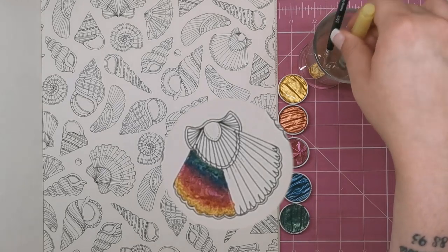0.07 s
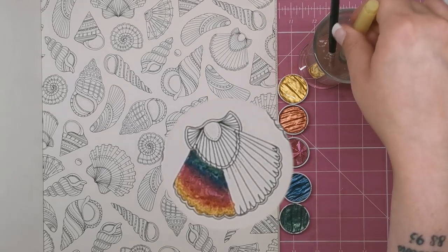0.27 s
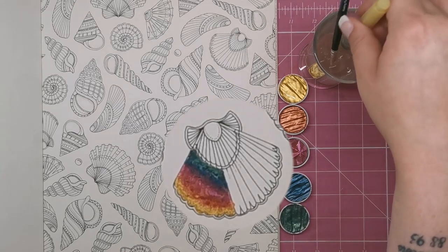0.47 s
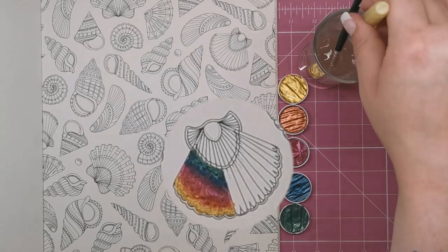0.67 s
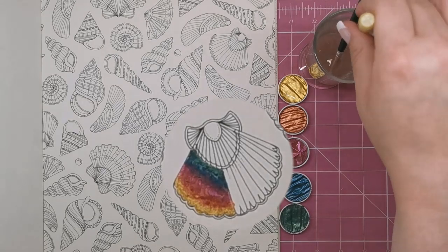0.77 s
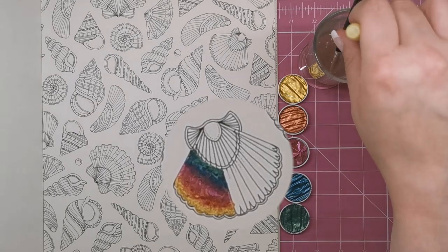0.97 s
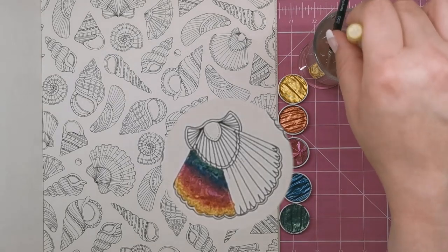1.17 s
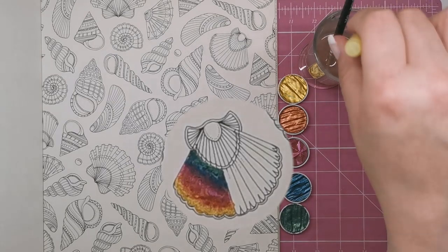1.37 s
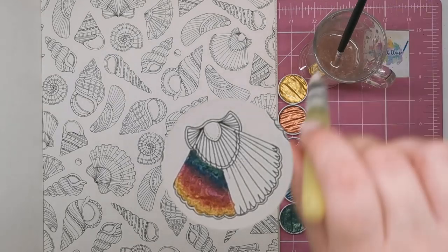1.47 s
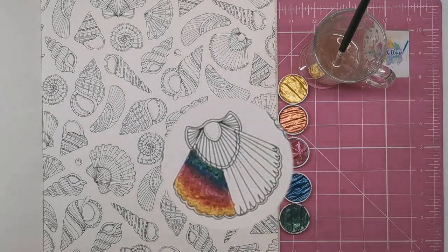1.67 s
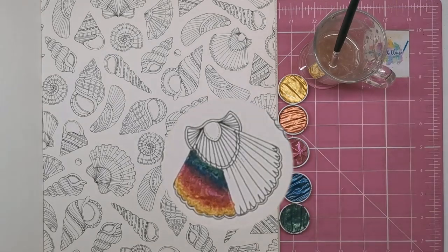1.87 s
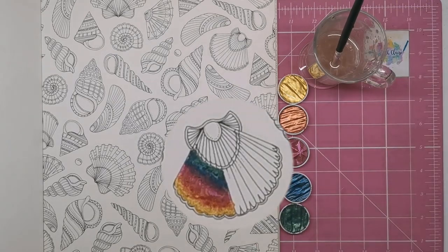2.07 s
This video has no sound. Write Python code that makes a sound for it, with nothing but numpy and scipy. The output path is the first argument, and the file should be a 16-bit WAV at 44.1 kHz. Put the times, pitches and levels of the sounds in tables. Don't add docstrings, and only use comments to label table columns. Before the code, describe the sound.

Irregular bright knocks of a brush on a hand-held water glass, the glass rocking dully on the table, a pause, then a final run of clinks with light scraping; close stereo pickup, small humming room.

```python
import sys
import numpy as np
from scipy import signal
from scipy.fft import rfft, irfft, next_fast_len
from scipy.io import wavfile

SR = 44100
rng = np.random.default_rng(int(sys.argv[2]) if len(sys.argv) > 2 else 0)


def gain_from_decibels(decibels):
    exponent = np.asarray(decibels, float) / 20
    return 10 ** exponent


def store_pcm(level_fs):
    pcm = np.round(np.clip(level_fs, -1, 1) * 32767).astype(np.int16)
    wavfile.write(sys.argv[1], SR, np.atleast_2d(pcm).T)


N = 93403
LEAD, LONG = SR // 10, SR // 2

# frequency in Hz, level in dB per Hz.
AIR_SPECTRUM = [(12, -45), (20, 1), (65, -8.5), (134, -4), (301, -18.5), (589, -13.5), (1570, -25),
                (2260, -21.5), (16000, -38)]
# frequency in Hz, left-right correlation.
PORT_LIKENESS = [(60, 1), (240, 0.72), (950, -0.05), (3770, -0.21), (15000, 0.17)]
# frequency in Hz, T60 in seconds.
WALL_T60 = [(100, 0.31), (1000, 0.25), (3000, .42), (9000, 0.34), (15000, 0.33)]

# start in seconds, lower ring in dB, upper ring in dB, ferrule clack in dB,
# time the ring stays free in seconds.
KNOCKS = [(-.006, -41, -39, -55, .025), (0.2376, -36.5, -35.5, -44, 0.039), (0.3062, -65, -60, -44, 0.038),
          (0.3783, -25, -35.5, -42.5, 0.025), (.6185, -64, -41.5, -67, 0.044),
          (0.6617, -26, -36, -47.5, 0.034), (1.03, -46.5, -40, -41.5, 0.049), (1.095, -62, -50, -56, .035),
          (1.151, -47.5, -37.5, -37, 0.042), (1.261, -57, -34.5, -37, 0.041),
          (1.367, -55.5, -34.5, -39.5, 0.046)]
# handle overtones in dB, belly in dB, rim in dB, crack in dB.
LANDINGS = [(-47, -64, -64, -38.5), (-60, -54.5, -52, -36.5), (-68, -63, -64, -46.5),
            (-43, -34.5, -36, -29), (-39, -60, -52, -40.5), (-51.5, -58, -47, -30.5), (-64, -66, -61, -40),
            (-68, -59, -55, -44.5), (-60, -54, -40, -34.5), (-61, -54.5, -39.5, -34.5),
            (-59, -59, -39, -35)]
# lower in Hz, upper in Hz.
RING_HZ = (3080, 3326)
# T60 in seconds, left over right in dB, left lead in radians.
RING_MODES = [
    (.5, -4.6, 2.06),
    (.36, 2.4, 1.86),
]
# family (0 handle, 1 belly, 2 rim), frequency in Hz.
OVERTONE_HZ = [(0, 3990), (1, 4345), (1, 4405), (1, 4462), (1, 4600), (2, 7315), (2, 7708), (2, 8895),
               (2, 8950), (2, 9200), (2, 9985)]
# level in dB, T60 in seconds, left over right in dB.
OVERTONE_MODES = [(-.5, .09, -3), (-7, 0.096, -1), (-1, 0.047, -1), (-3.5, 0.071, -4.5), (-2, 0.026, -3),
                  (-14, 0.071, 1.6), (-8, 0.062, -1), (-4, 0.062, -6.5), (-1, 0.095, -5.5),
                  (-4.5, 0.04, -6), (-15, 0.035, -5)]
# frequency in Hz, level in dB, T60 in seconds, left over right in dB.
FERRULE_MODES = [(948, -9, 0.031, -1.5), (1349, -6, 0.029, -17.5), (1411.4, 4.3, 0.029, -2.5),
                 (1563, -2.5, 0.024, -8.5), (2170, -7.5, 0.029, 1.5), (2415, -11, 0.03, 1)]
# frequency in Hz, level in dB.
CRACK_SPECTRUM = [(500, -18), (1500, -7), (3500, -2), (5000, -4.5), (7500, -2), (10000, -2), (13000, -12),
                  (16000, -22.5)]

# start in seconds, level in dB, extra level of upper modes in dB.
THUDS = [(0.03, -52, -4), (.088, -59, -2.5), (.156, -45, -4), (.24, -62, 7), (0.307, -46, -1.5),
         (0.457, -52, -2.5), (0.5746, -40, -2), (.64, -57.5, 3.5), (1.031, -54.5, 6), (1.097, -60, 7),
         (1.152, -49, 5), (1.262, -46, 3.5), (1.368, -46, 5.5)]
# frequency in Hz, level in dB, T60 in seconds, left over right in dB.
TABLE_MODES = [(86.8, -8, 0.31, -5.5), (124.5, 1.5, .17, -2.5), (188, -3.5, .15, 4.5),
               (237.8, -4, .15, 0.5), (279, -8, .13, 6.5)]

# start in seconds, rise in seconds, hold in seconds, fade T60 in seconds,
# level in dB.
TOUCH = (.9995, .002, 0.0334, 0.56, -56.5)
SCRAPE = (1.025, 0.01, 0.16, 1, -58)
WRIST = (1.385, .03, .16, .25, -64)
SLIDE = (1.44, .12, .145, .2, -66)
# frequency in Hz, width in Hz, level in dB.
RIM_EDGE = [(620, 130, -11), (2180, 170, 1), (2820, 250, -10)]
BRISTLES = [(610, 210, -8.5), (2170, 250, -0.5), (2800, 430, -4.5), (4530, 2000, -10), (7000, 2700, -12)]
TABLE_BOARD = [(150, 50, -3), (280, 70, -.4), (450, 120, -9)]
SLEEVE = [(129, 40, -2.5), (583, 70, -4.5), (702, 73, 0.1), (2200, 500, -11), (6800, 430, -22)]

RISE_S = 0.0016
WALL_DELAY_S = 0.006
ROOM_DB = -4


def unit(x):
    return x / np.sqrt(np.mean(x ** 2) + 1e-20)


def along(points, hz):
    f, v = np.transpose(points)
    return np.interp(np.log(hz + 1), np.log(f + 1), v)


def filtered(x, response):
    n = x.shape[-1]
    m = next_fast_len(n + 8192)
    spectrum = rfft(x, m) * response(np.fft.rfftfreq(m, 1 / SR))
    return irfft(spectrum, m)[..., :n]


def air():
    air_db, hum_db, hum_hz, hum_width_hz = -67, -80.5, 588.3, 8.3

    def spread(hz):
        angle = np.arccos(np.clip(along(PORT_LIKENESS, hz), -1, 1)) / 2
        return gain_from_decibels(along(AIR_SPECTRUM, hz)) * [np.cos(angle), np.sin(angle)]

    mid, side = filtered(rng.standard_normal((2, N)), spread)
    tone = np.array([mid + side, mid - side]) / np.std(mid)
    hum = filtered(rng.standard_normal(N), lambda hz: 1 / (1 + ((hz - hum_hz) / hum_width_hz) ** 2))
    return gain_from_decibels(air_db) * tone + gain_from_decibels(hum_db) * unit(hum)


def mode(hz, db, t60, pan_db, lead, rise=RISE_S):
    t = np.arange(LONG) / SR
    side = np.array([[0.5], [-0.5]])
    envelope = gain_from_decibels(db + side * pan_db - 60 * t / t60) * (1 - np.exp(-t / rise))
    return envelope * np.sin(2 * np.pi * hz * t + side * lead)


def add(out, s, sound, wet_db):
    hz, t, z = signal.stft(rng.standard_normal((2, LONG)), SR, nperseg=256)
    decay = gain_from_decibels(-60 * t / along(WALL_T60, hz)[:, None])
    tail = signal.istft(z * decay, SR, nperseg=256)[1]
    tail = np.pad(tail / np.linalg.norm(tail[0]), ((0, 0), (round(WALL_DELAY_S * SR), 0)))
    wet = signal.fftconvolve(sound, tail, axes=1)[:, :LONG]
    out[:, LEAD + round(s * SR):][:, :LONG] += sound + gain_from_decibels(wet_db) * wet


def main_ring(lower_db, upper_db, free_s):
    settle_db, settle_s = -8.5, 0.0041
    twin_hz, twin_db, twin_t60 = 23, -21, 0.5
    t = np.arange(LONG) / SR
    settle = gain_from_decibels(settle_db * np.clip((t - free_s) / settle_s, 0, 1))
    x = 0
    for db, hz, (t60, pan, lead) in zip((lower_db, upper_db), RING_HZ, RING_MODES):
        x = x + settle * mode(hz, db, t60, pan, lead)
        x = x + mode(hz - twin_hz, db + twin_db, twin_t60, -pan, -lead)
    return x


def overtones(family_db):
    x = 0
    for (family, hz), (db, t60, pan) in zip(OVERTONE_HZ, OVERTONE_MODES):
        level = family_db[family] + db + 2 * rng.normal()
        x = x + mode(hz, level, t60, pan, rng.uniform(-np.pi, np.pi))
    return x


def ferrule(clack_db):
    return sum(mode(hz, clack_db + db + 0.58 * rng.normal(), t60, pan, -1.69)
               for hz, db, t60, pan in FERRULE_MODES)


def crack(crack_db):
    t60 = 0.024
    t = np.arange(LONG) / SR
    noise = unit(filtered(rng.standard_normal((2, LONG)), lambda hz: gain_from_decibels(along(CRACK_SPECTRUM, hz))))
    return gain_from_decibels(crack_db - 60 * t / t60) * (1 - np.exp(-t / RISE_S)) * noise


def glass():
    ring_room_db, tone_room_db = -12, -4.5
    out = np.zeros((2, N + LEAD + LONG))
    for (s, lower_db, upper_db, clack_db, free_s), landing in zip(KNOCKS, LANDINGS):
        *family_db, crack_db = landing
        add(out, s, main_ring(lower_db, upper_db, free_s), ROOM_DB + ring_room_db)
        add(out, s, overtones(family_db) + ferrule(clack_db), ROOM_DB + tone_room_db)
        add(out, s, crack(crack_db), ROOM_DB)
    return out[:, LEAD:LEAD + N]


def table():
    push_db, push_s, push_width_s = 5, 0.0044, 0.0015
    upper_hz, rise_s, room_db = 150, 0.0039, -12.5
    out = np.zeros((2, N + LEAD + LONG))
    u = (np.arange(LONG) / SR - push_s) / push_width_s
    push = np.clip(u + push_s / push_width_s, 0, 1) * (1 - u * u) * np.exp(-u * u / 2)
    for s, level_db, upper_db in THUDS:
        x = gain_from_decibels(level_db + push_db) * push
        for hz, db, t60, pan in TABLE_MODES:
            x = x + mode(hz, level_db + db + upper_db * (hz > upper_hz), t60, pan, -0.2, rise_s)
        add(out, s, x, room_db)
    return out[:, LEAD:LEAD + N]


def rub(stroke, body, shared):
    grain_db, grain_hz = 2.5, 40
    s, rise, hold, t60, db = stroke
    t = np.arange(N) / SR - s
    slow = filtered(rng.standard_normal(N), lambda hz: 1 / (1 + (hz / grain_hz) ** 2))
    grain = gain_from_decibels(grain_db * unit(slow))
    own, both = rng.standard_normal((2, N)), rng.standard_normal(N)

    def resonances(f):
        return sum((-1) ** k * gain_from_decibels(g) * 1j * f * w / (c * c - f * f + 1j * f * w)
                   for k, (c, w, g) in enumerate(body))

    x = unit(filtered(grain * (own + shared * both), resonances))
    fade_db = -60 * np.maximum(t - rise - hold, 0) / t60
    return x * np.clip(t / rise, 0, 1) * gain_from_decibels(db + fade_db)


def brush_on_rim():
    return rub(TOUCH, RIM_EDGE, 0.65) + rub(SCRAPE, BRISTLES, 0.37)


def arm_leaving():
    return rub(WRIST, TABLE_BOARD, 2.5) + rub(SLIDE, SLEEVE, 1.7)


def scene():
    return glass() + table() + brush_on_rim() + arm_leaving() + air()


def low_pass(x):
    return signal.sosfilt(signal.butter(12, 16120, fs=SR, output="sos"), x)


def record(dry):
    mix = filtered(dry, lambda hz: hz < 15900)
    return low_pass(mix)


dry = scene()
out = record(dry)
store_pcm(out)
```